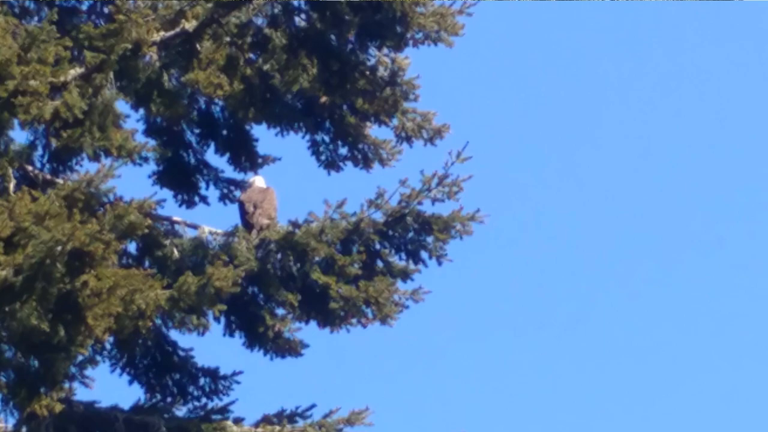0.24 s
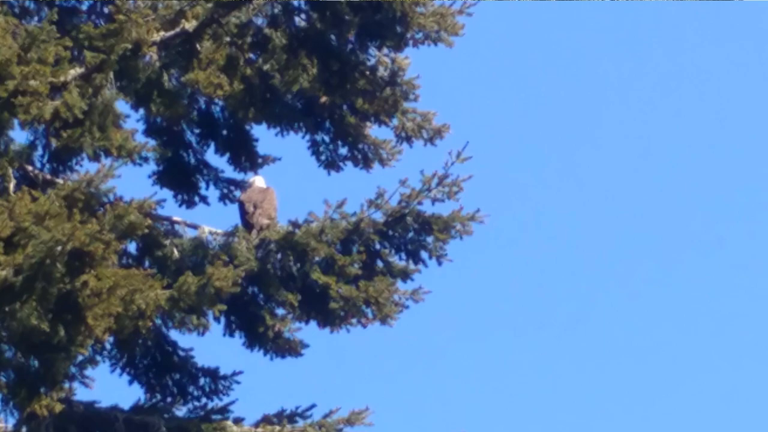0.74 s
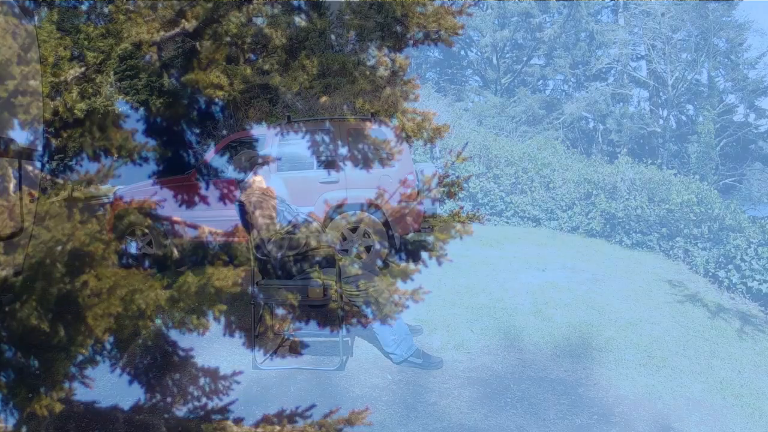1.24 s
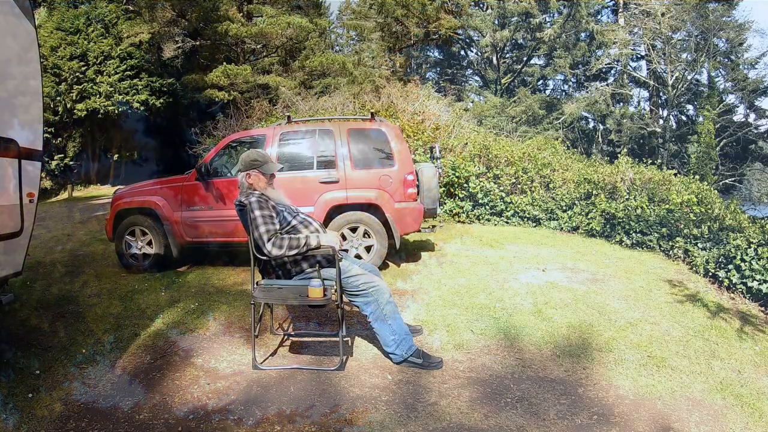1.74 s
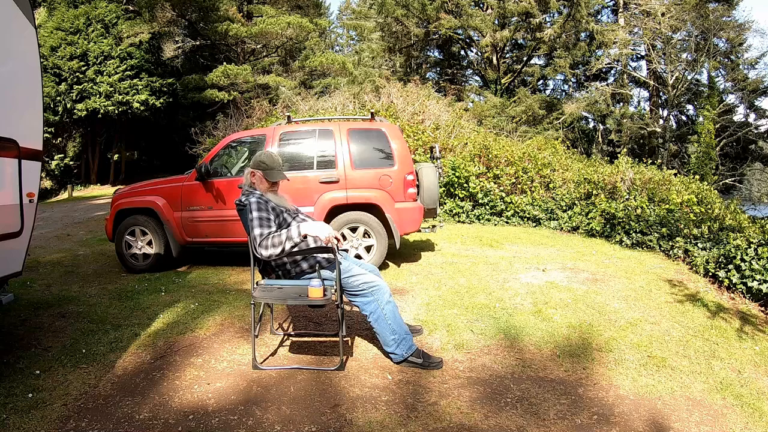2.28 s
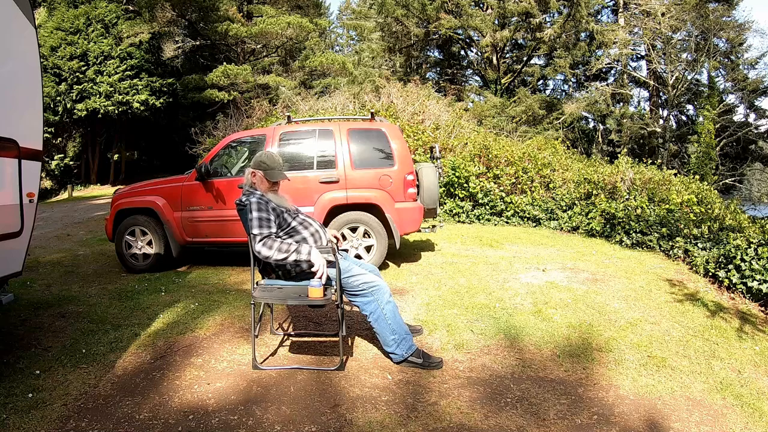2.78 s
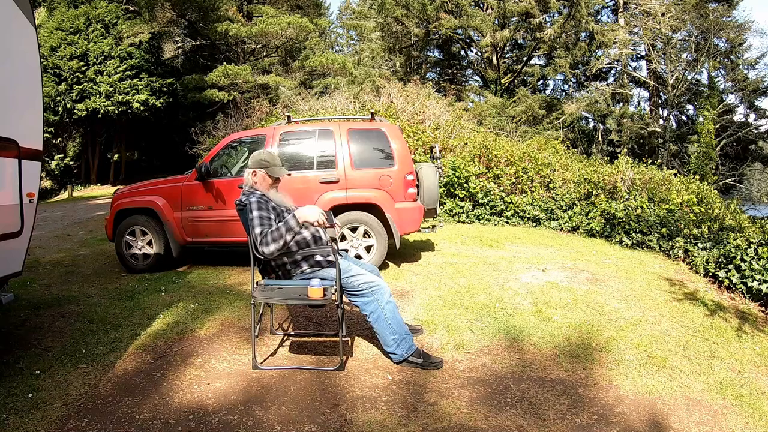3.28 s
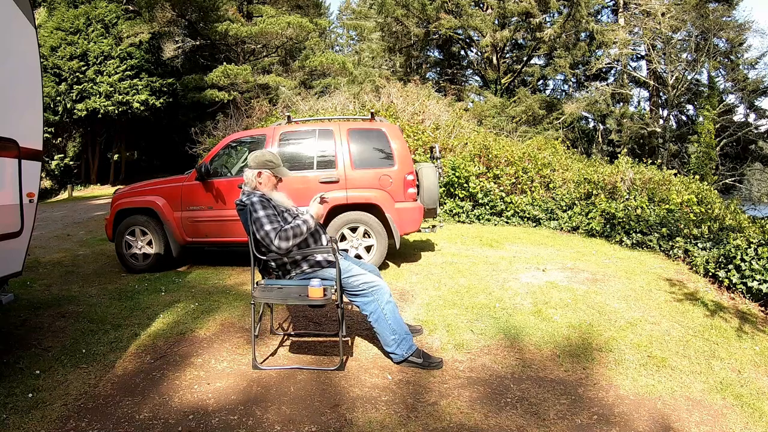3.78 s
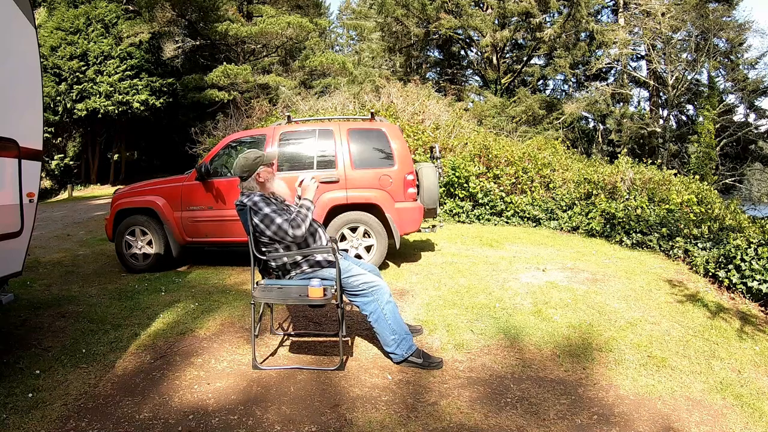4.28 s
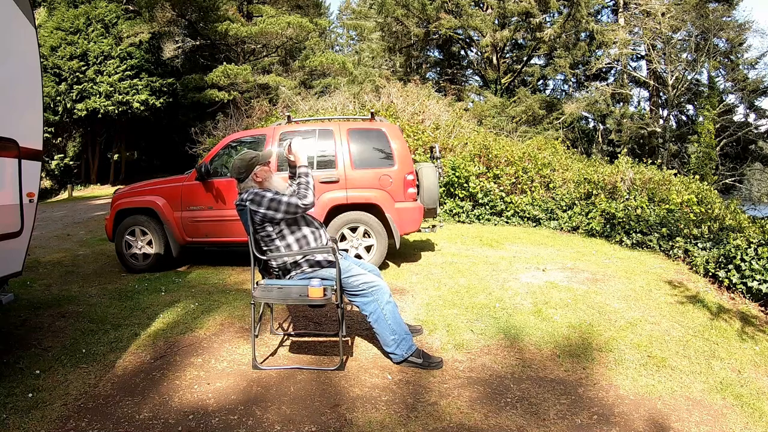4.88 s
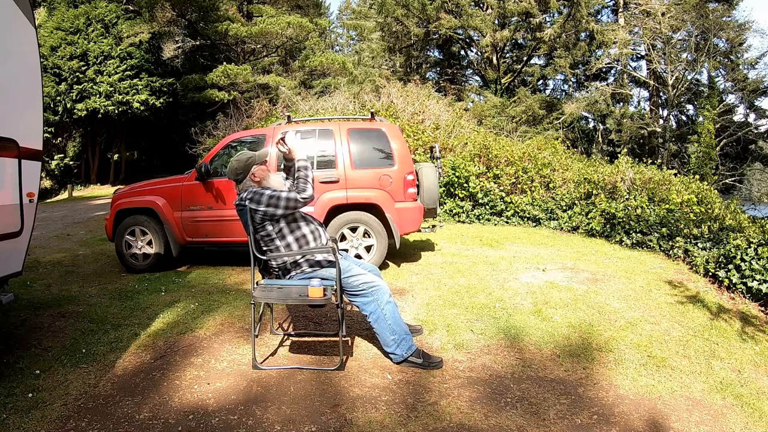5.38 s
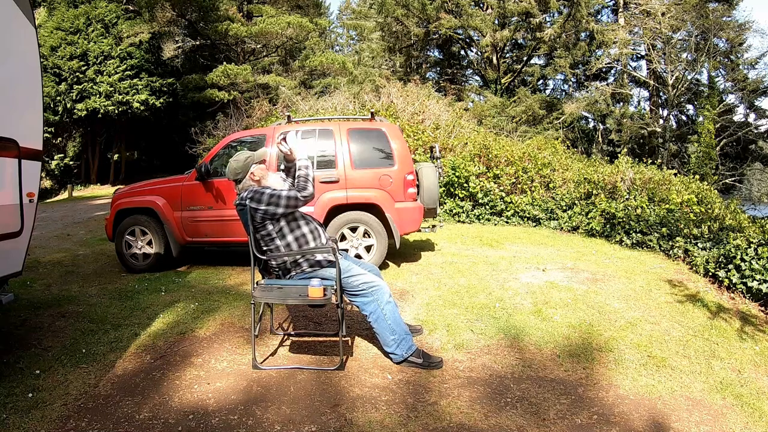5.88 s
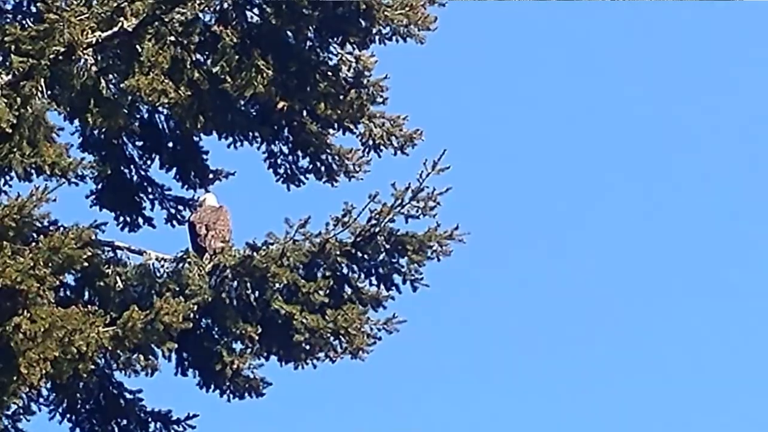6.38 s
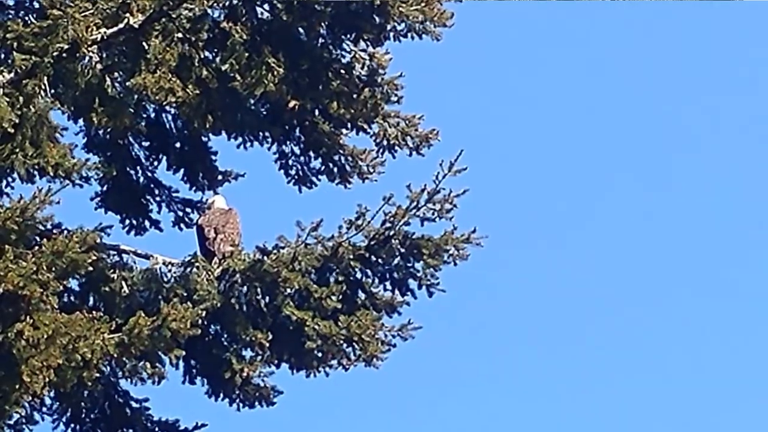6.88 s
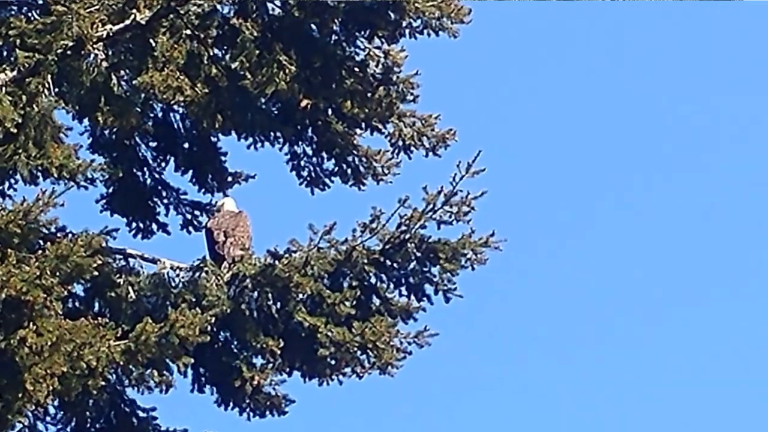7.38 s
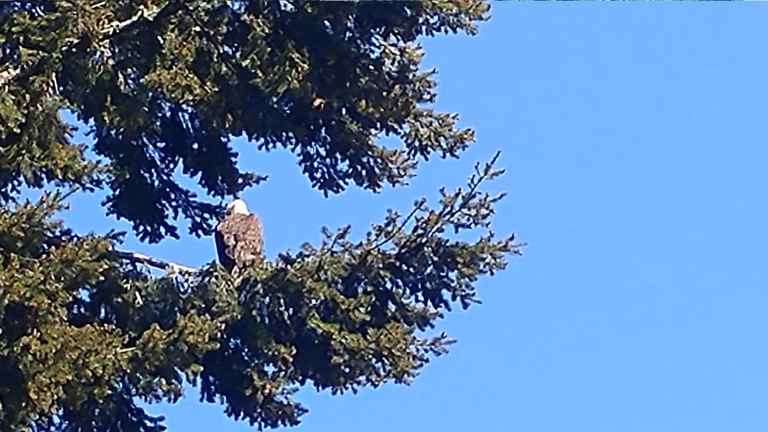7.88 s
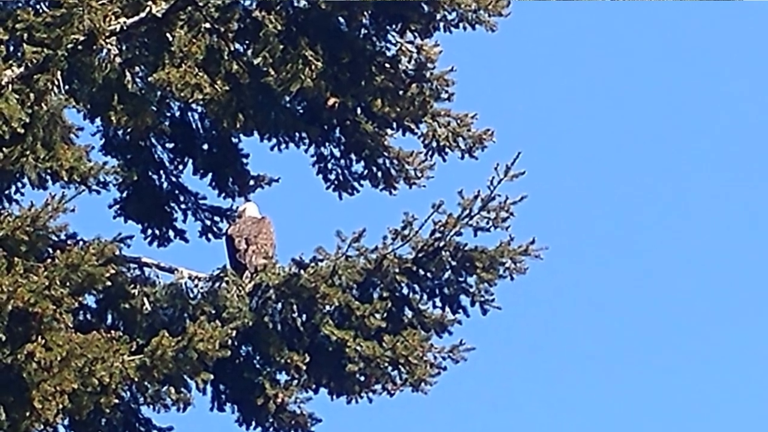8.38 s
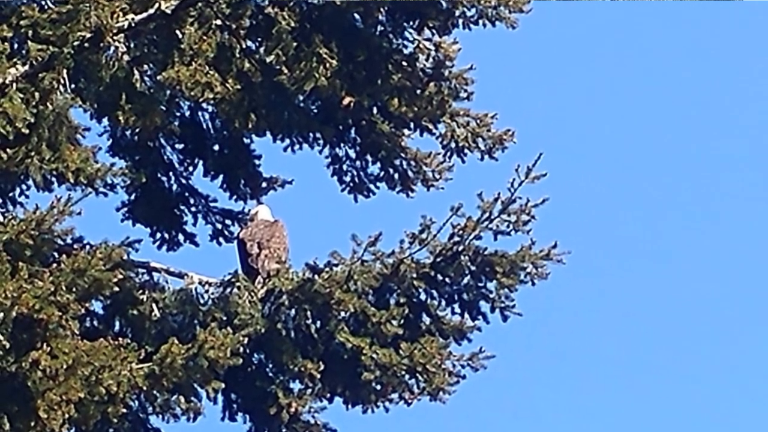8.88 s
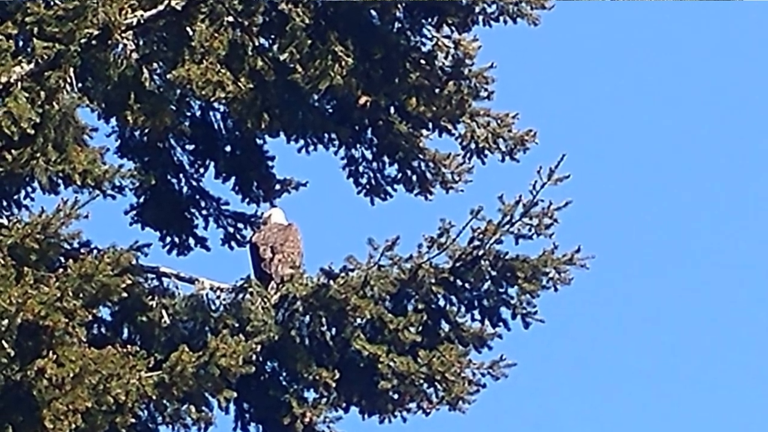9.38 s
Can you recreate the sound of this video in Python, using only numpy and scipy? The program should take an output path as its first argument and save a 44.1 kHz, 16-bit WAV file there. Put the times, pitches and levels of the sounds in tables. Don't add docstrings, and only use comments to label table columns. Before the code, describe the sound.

Thin, whistled eagle chatter comes early, slightly right of centre, its short notes dropping in pitch and fading into dense woodland echo. Then mostly low steady hiss and gentle wind rumble, with dry ticks to the right, a single woody knock and two breathy arched squeaks. Tiny birds peep faintly. Finally the eagle returns with brief yelping low-high pipes, cracking at their ends, while wind rumbles a little more.

```python
import sys
import numpy as np
from scipy import signal
from scipy.io import wavfile
from scipy.ndimage import uniform_filter1d

SR = 44100
rng = np.random.default_rng(int(sys.argv[2]) if len(sys.argv) > 2 else 0)


def elevation(decibels):
    levels = np.asarray(decibels, float)
    return 10 ** (levels / 20)


def store_wav(level_fs):
    pcm = np.round(np.clip(np.atleast_2d(level_fs), -1, 1) * 32767)
    wavfile.write(sys.argv[1], SR, pcm.T.astype(np.int16))


N = 425124
TOP_HZ = 10680


def evened(x):
    return x / np.sqrt(np.mean(x ** 2) + 1e-20)


def read(points, hz):
    f, value = np.transpose(points)
    return np.interp(np.log(hz + 1), np.log(f + 1), value)


def add(mix, s, sound):
    part = mix[..., round(s * SR):][..., :sound.shape[-1]]
    part += sound[..., :part.shape[-1]]


def resonate(x, hz, width):
    turn = np.exp(2j * np.pi * np.cumsum(hz * np.ones(len(x))) / SR)
    r = np.exp(-np.pi * width / SR)
    return 2 * (turn * signal.lfilter([1 - r], [1, -r], x / turn)).real


def band(x, lo_hz, hi_hz):
    corners = np.clip([lo_hz, hi_hz], 20, SR / 2.2)
    return signal.sosfilt(signal.butter(2, corners, "bandpass", fs=SR, output="sos"), x)


def ends(length, rise, fall):
    t = np.arange(0, max(length, .003), 1 / SR)
    nearest_end = np.minimum(t / rise, (t[-1] - t) / fall)
    return t, np.sin(np.pi / 2 * np.clip(nearest_end, 0, 1)) ** 2


def swell(rise_s, fade_s, top_db, ends_db):
    t = np.arange(0, rise_s + fade_s, 1 / SR)
    return top_db + np.interp(t, [0, rise_s, rise_s + fade_s], [ends_db, 0, ends_db])


def whistle(hz, shape, level_db, partials, waver, breath_db, fuzz, bloom_s=1e-4):
    air = rng.standard_normal((2, len(hz) + 200))
    slow = signal.sosfilt(signal.butter(4, 300, fs=SR, output="sos"), air)
    wobble, flutter = evened(slow)[:, 200:]
    turn = 2 * np.pi * np.cumsum(hz * (1 + waver * wobble)) / SR
    bloom = (1 - np.exp(-np.arange(len(hz)) / (bloom_s * SR))) ** 2
    upper = sum(elevation(db) * np.sin(k * turn) for k, db in partials)
    mean_hz = hz.mean()
    breath = band(band(air[0], .6 * mean_hz, 1.2 * mean_hz), .6 * mean_hz, 1.25 * mean_hz)
    voice = np.sin(turn) + (1 + fuzz * flutter) * bloom * upper
    voice += elevation(breath_db) * evened(breath)[200:]
    return np.sqrt(2) * elevation(level_db) * voice * shape


def pipe(length, start_hz, end_hz, level_db, dull_db=0, husk_db=0):
    # note f/Hz, level/dB
    second_partial = [(1520, -10), (1890, -19.5), (2500, -33), (3050, -28.5)]
    # multiple of f, level/dB
    higher_partials = [(2.3, -44), (3, -52.5), (4, -56)]
    t, shape = ends(length + .003, rise=.005, fall=.007)
    hz = start_hz + (end_hz - start_hz) * t / t[-1]
    partials = [(2, read(second_partial, hz.mean()) + dull_db), *higher_partials]
    return whistle(hz, shape, level_db, partials, waver=.003, breath_db=-28.5 + husk_db, fuzz=.2)


def chatter():
    # t/s, length/s, top f/Hz, sag f/Hz, level/dB
    chatter_notes = [
        (0.289, 0.067, 2749, 173, -17.5),
        (0.402, 0.06, 2842, 328, -17.5),
        (0.502, 0.044, 2804, 174, -17.5),
        (0.616, 0.04, 2740, 137, -16.5),
        (0.744, 0.039, 2720, 100, -16.5),
        (0.871, 0.029, 2683, 222, -19),
        (1.002, 0.017, 2632, 140, -22),
        (1.341, .025, 2435, 90.5, -33),
    ]
    # lead t/s, f/Hz, level/dB
    grace_notes = [
        (0.001976, 2250, -45),
        (0.0015, 3090, -24.5),
        (0.0028, 3100, -32.5),
        (0.0011, 2250, -36.5),
        (0.0028, 1920, -35.5),
        (.003, 1950, -30.5),
        (.004, 1940, -27),
        (0.0012, 1890, -30.5),
    ]
    # multiple of f, level/dB
    chatter_partials = [(1.5, -59.5), (2, -20), (2.5, -48.5), (3, -29.5), (3.5, -54.5), (4, -55.5),
                        (4.5, -53.5), (5, -50)]
    grace_pull = 0.37
    out = np.zeros((2, N))[0]
    for (s, length, top_hz, sag_hz, level_db), (early, grace_hz, grace_db) in zip(chatter_notes, grace_notes):
        t, shape = ends(length, rise=.0045, fall=6.5 * length ** 2)
        scoop_hz = 130 if grace_hz > top_hz else 285
        hz = top_hz - scoop_hz * np.exp(-t / (.15 * length)) - sag_hz * (t / length) ** 2
        add(out, s, whistle(hz, shape, level_db, chatter_partials, waver=.002, breath_db=-39, fuzz=.22,
                            bloom_s=0.0053))
        pull_hz = grace_pull * (top_hz - grace_hz) / 2
        grace = pipe(0.0076, grace_hz - pull_hz, grace_hz + pull_hz, grace_db, dull_db=-8.5)
        add(out, s - early - .001, grace)
    return out


def piping():
    # t/s, time between rungs/s, level/dB, top rung over that/dB
    ladders = [
        (8.570, .0068, -22, -6.5),
        (9.024, .0065, -22, 0.5),
        (9.446, 0.0076, -21.5, 0.5),
    ]
    # length/s, start f/Hz, end f/Hz, level/dB
    rungs = [
        (.0095, 1438, 1606, -1),
        (.0115, 1745, 2036, 1.6),
        (.013, 2420, 2600, 1.7),
    ]
    # times middle rung f, times top rung f, level under the note/dB
    mixed_tones = [
        (1, 1, -26),
        (2, 1, -41),
        (-1, 2, -12.5),
    ]
    # t/s, length/s, start f/Hz, end f/Hz, level/dB
    first_try = [
        (8.118, 0.0066, 1506, 1712, -29),
        (8.119, 0.018, 1787, 1955, -26),
    ]
    # t/s, length/s, start f/Hz, end f/Hz, level/dB
    high_notes = [
        (8.274, 0.014, 3046, 3097, -22),
        (8.712, 0.015, 3098, 3050, -19.5),
        (9.139, 0.014, 3155, 2988, -20.5),
    ]
    # t/s, length/s, start f/Hz, end f/Hz, level/dB
    cracks = [(1.343, 0.0097, 2920, 3050, -47), (.355, 0.011, 2300, 2160, -42.5),
              (0.54, 0.013, 2134, 2000, -41), (8.293, 0.0046, 2980, 3270, -18),
              (8.296, 0.012, 3377, 2780, -30), (8.729, .012, 2390, 2970, -27),
              (9.159, 0.0087, 2630, 2250, -29), (9.183, .008, 2100, 1390, -38),
              (9.502, 0.0049, 2700, 2300, -25), (9.528, 0.0082, 2433, 2580, -31.5),
              (9.548, 0.02, 2616, 2330, -40.5), (9.550, 0.012, 1857, 1890, -35),
              (9.566, 0.018, 2104, 1435, -35), (9.584, 0.0065, 2260, 1510, -36)]
    husk_db = 9
    out = np.zeros(N)
    for s, step, level_db, top_db in ladders:
        for k, (length, start_hz, end_hz, db) in enumerate(rungs):
            rung_s = length + step - rungs[0][0] * 0.73
            rung_db = level_db + db + top_db * (k == 2)
            add(out, s + k * step - .001, pipe(rung_s, start_hz, end_hz, rung_db, husk_db=husk_db))
        for middle, top, db in mixed_tones:
            hz = round(middle) * rungs[1][2] + round(top) * rungs[2][1]
            add(out, s + 2 * step, pipe(step, hz, 1.015 * hz, level_db + db, husk_db=husk_db))
    for s, *note in first_try:
        add(out, s - .001, pipe(*note, dull_db=-11))
    for s, *note in high_notes:
        add(out, s - .001, pipe(*note))
    for s, *note in cracks:
        add(out, s - .001, pipe(*note, dull_db=-7.5, husk_db=husk_db))
    return out


def glides(rows):
    out = np.zeros(N)
    for s, length, start_hz, end_hz, level_db in rows:
        t, shape = ends(length, rise=0.0031, fall=0.0046)
        hz = start_hz + (end_hz - start_hz) * t / t[-1]
        add(out, s, whistle(hz, shape, level_db, [], waver=0.014, breath_db=-15.5, fuzz=0))
    return out


def drawn_air():
    # t/s, start f/Hz, level/dB
    draws = [
        (0.285, 5910, -51.5),
        (0.379, 6445, -49),
        (0.496, 6680, -49.5),
        (0.607, 5300, -42),
        (0.74, 4930, -45.5),
        (0.869, 4245, -47.5),
        (8.262, 6400, -54.5),
        (8.663, 6350, -54),
        (8.701, 5800, -57.5),
        (9.124, 5730, -50.5),
    ]
    return glides([(s, .011, hz, .86 * hz, db) for s, hz, db in draws])


def small_birds():
    # t/s, number of notes, start f/Hz, level/dB
    trills = [
        (1.191, 3, 5120, -59),
        (8.204, 2, 3470, -49),
    ]
    # t/s, length/s, start f/Hz, end f/Hz, level/dB
    peeps = [
        (0.113, 0.034, 6000, 5400, -73.5),
        (1.57, 0.0102, 4440, 4300, -75),
        (2.056, 0.0284, 4370, 4250, -73),
        (6.68, 0.012, 6800, 6800, -78),
        (7.656, 0.013, 7250, 6300, -70.5),
        (7.702, 0.026, 8200, 6200, -68.5),
        (8.656, 0.0069, 4030, 6400, -56),
        (8.882, .006, 6970, 6700, -62),
        (9.119, 0.0049, 4610, 6060, -41.5),
    ]
    gap_s, note_s, fall = .012, .009, .68
    rows = list(peeps)
    for s, count, hz, db in trills:
        rows += [(s + k * gap_s, note_s, hz, fall * hz, db) for k in range(round(count))]
    return glides(rows)


def rasped(hz, level_db):
    hz = uniform_filter1d(hz, size=600, mode="nearest")
    rasp, hiss = rng.standard_normal((2, SR // 2))[:, :len(hz)]
    for _ in range(4):
        rasp = resonate(rasp, hz, .2 * hz.mean())
        hiss = resonate(hiss, 0.85 * hz, 0.48 * hz.mean())
    sound = evened(rasp) + elevation(-8.0) * evened(hiss)
    return elevation(level_db) * sound * signal.windows.tukey(len(hz), .2)


def squeaks():
    # t/s, rise/s, fall/s, crest f/Hz, level/dB
    arches = [
        (5.595, .15, 0.052, 6970, -55.5),
        (5.85, 0.0616, 0.05, 5980, -50.5),
    ]
    # t/s, length/s, start f/Hz, end f/Hz, level/dB
    rasps = [
        (5.72, .05, 4950, 4400, -50.5),
        (5.715, .055, 2300, 2650, -55),
        (5.895, .055, 2650, 2600, -51.5),
        (6.05, .02, 3400, 3000, -55),
        (6.066, .014, 2700, 2300, -53),
        (6.05, .04, 1790, 2050, -54),
        (5.715, .065, 9700, 8900, -71),
        (5.895, .045, 8500, 8500, -72),
    ]
    foot_hz, end_hz = 3700, 3180
    out = np.zeros(N)
    for s, rise, fall, crest_hz, level_db in arches:
        t = np.arange(0, rise + fall, 1 / SR)
        up = np.clip(1 - t / rise, 0, 1)
        down = np.clip((t - rise) / fall, 0, 1)
        hz = crest_hz - (crest_hz - foot_hz) * up ** 2.7 - (crest_hz - end_hz) * down ** 2.2
        opening_db = -7 * np.clip(1 - t / 0.032, 0, 1)
        add(out, s, rasped(hz, level_db + opening_db - 11 * down ** 4))
        fill = evened(band(rng.standard_normal(SR // 4)[:len(t)], 2300, 6300))
        add(out, s, elevation(level_db - 7) * fill * np.sin(np.pi * down))
    for s, length, start_hz, end_hz, level_db in rasps:
        shape_db = swell(length / 2, length / 2, level_db, ends_db=-6)
        add(out, s, rasped(np.linspace(start_hz, end_hz, len(shape_db)), shape_db))
    return out


def tap(db, t60, body, tail_db):
    t = np.arange(6000) / SR
    decay = elevation(-60 * t / t60) + elevation(tail_db - 60 * t / .16)
    burst = rng.standard_normal(len(t)) * decay
    rung = sum(elevation(g_db) * resonate(resonate(burst, hz, width), hz, width) for hz, width, g_db in body)
    return elevation(db) * rung / abs(rung).max()


def chair():
    # t/s, peak level/dB, T60/s, left over right/dB
    tick_events = [
        (1.9911, -41.5, 0.016, -11),
        (2.1047, -58, 0.03, -7.5),
        (2.8934, -59, 0.03, -6),
        (2.966, -61, 0.03, -9),
        (3.0394, -61.5, 0.029, -5),
        (3.463, -64, 0.026, -8),
        (5.424, -50, 0.03, -8.5),
        (6.2648, -50, 0.016, -9),
    ]
    # t/s, peak level/dB, T60/s
    knock = [
        (3.2073, -22.5, 0.045),
    ]
    # f/Hz, width/Hz, level/dB
    tick_body = [(4300, 1200, 0), (5800, 1400, 0), (9600, 1600, -9)]
    # f/Hz, width/Hz, level/dB
    knock_body = [(620, 760, 7), (1470, 320, 12), (2300, 450, 10), (3300, 970, 1), (4430, 2000, -4),
                  (5830, 1100, -24.5), (9200, 2000, -25)]
    # t/s, swell/s, fade/s, level/dB, ends/dB
    thud = [3.74, .035, .045, -45.5, -11.5]
    # t/s, swell/s, fade/s, level/dB, ends/dB
    rustle = [7.325, .012, .075, -63.5, -13]
    out = np.zeros((2, N))
    for s, db, t60, pan_db in tick_events:
        add(out, s, tap(db, t60, tick_body, tail_db=-14) * elevation([[pan_db / 2], [-pan_db / 2]]))
    add(out, knock[0][0], tap(*knock[0][1:], knock_body, tail_db=-11)[None])
    level_db = swell(*thud[1:])
    low_noise = band(rng.standard_normal((1, SR // 4))[:, :len(level_db)], 135, 283)
    add(out, thud[0], elevation(level_db) * evened(low_noise))
    level_db = swell(*rustle[1:])
    cloth = band(rng.standard_normal((2, SR // 4))[:, :len(level_db)], 3500, 12500)
    add(out, rustle[0], elevation(level_db) * evened(cloth))
    return out


def trees(x, near_s, far_drop_db):
    # t/s, level/dB
    boughs = [
        (.0095, -11.5),
        (0.0173, -12),
        (.041, -15.5),
        (.085, -32),
    ]
    # f/Hz, T60/s
    scatter_t60 = [(500, .8), (1900, 1.5), (2500, 1.1), (3100, 0.89), (5500, 1.2), (9000, 0.6)]
    # f/Hz, level/dB
    scatter_colour = [(1400, -2.5), (1900, -2.5), (2500, 1), (3100, 0), (5500, 7), (8000, 1), (12000, -8.5)]
    # f/Hz, level/dB
    scatter_width = [(1000, -20.5), (3000, -30.5), (5000, -16.5), (9000, -5.5)]
    scatter_db = -3
    taps = np.zeros((2, SR))
    at = np.arange(600, SR - 20, 20) + rng.integers(0, 20, (2, (SR - 601) // 20))
    np.put_along_axis(taps, at, rng.choice([-1., 1.], at.shape), 1)
    hz, t, z = signal.stft(taps, SR, nperseg=256)
    far = 1 / (1 + np.exp(-(t - near_s) / .006))
    clumps = uniform_filter1d(rng.standard_normal(z.shape[1:]), size=2, axis=1)
    clumps = evened(uniform_filter1d(clumps, size=4, axis=0))
    decay_db = -60 * t / read(scatter_t60, hz)[:, None]
    z = z * elevation(decay_db + far_drop_db * far + 2.2 * clumps + read(scatter_colour, hz)[:, None])
    z[1] *= elevation(read(scatter_width, hz) - scatter_db)[:, None]
    mid, side = elevation(scatter_db - 27.5) * signal.istft(z, SR, nperseg=256)[1]
    for s, db in boughs:
        mid[round(s * SR)] += elevation(db)
    return signal.fftconvolve(x[None], np.array([mid + side, mid - side]), axes=1)[:, :N]


def wash():
    # f/Hz, level per Hz/dB
    wash_low = [(12, -37.5), (20, -23.5), (65, -6), (113, -5.5), (141, -3.5), (169, -7), (198, 4.5),
                (221, -12), (295, -7.5), (416, -13), (812, 0.5), (1500, -7), (1950, -41), (3300, -120)]
    # f/Hz, level per Hz/dB
    wash_high = [(880, -30), (1500, -0.5), (2010, -6), (3340, -18.5), (3610, -23), (5820, -26), (7580, -37),
                 (9580, -33.5), (10600, -50.5), (12100, -60), (15400, -54)]
    # f/Hz, likeness
    likeness = [(30, 1), (100, 0.96), (290, 0.92), (640, 0.72), (1400, 0.37), (3000, 0.7), (6800, 0.076),
                (15000, 0.061)]
    # f/Hz, left over right/dB
    balance = [(60, -1), (150, 0.5), (380, 2.5), (950, -3), (2380, 0.5), (5980, -4.5), (15000, -7)]
    # t/s, level/dB
    wind = [(0, 8.5), (.7, 10), (1.4, 9), (2, 4), (3, -4.5), (3.8, 1.5), (5.1, -1.4), (6.1, 6.5), (6.6, -3),
            (7.6, 12.5), (8.1, 14), (8.7, 10), (9.64, 9.5)]
    # t/s, half length/s, level/dB
    hiss_swells = [
        (0.299, 1.3, 8),
        (3.793, .4, 2.2),
        (5.956, .4, 6),
        (7.605, .3, 3.5),
        (9.64, .4, 2),
    ]
    frames, hz = N // 256 + 5, np.fft.rfftfreq(1024, 1 / SR)
    t = np.arange(frames) * 256 / SR
    a, b, c, d, patches = rng.standard_normal((frames, 513, 5)).T
    lumps = evened(uniform_filter1d(patches[0], size=18))
    patches = evened(uniform_filter1d(uniform_filter1d(patches, size=10, axis=0), size=14, axis=1))
    rumble_db = np.interp(t, *np.transpose(wind)) + 3 * lumps
    wash_db = 0.16 + 0.2155 * t
    hiss_db = -1.54 + sum(db * np.exp(-((t - s) / half) ** 2) for s, half, db in hiss_swells)
    colour_db = np.where(hz < 1500, read(wash_low, hz), read(wash_high, hz) - 9)
    low = (1 / (1 + (hz / 130) ** 4))[:, None]
    high = (1 / (1 + (5000 / (hz + 1)) ** 3))[:, None]
    field_db = colour_db[:, None] + low * rumble_db + (1 - low) * wash_db + high * hiss_db
    field_db += 12 * (hz > TOP_HZ)[:, None] + 0.25 * patches
    same, left = np.clip(read(likeness, hz), -1, 1)[:, None], a + 1j * b
    z = np.array([left, same * left + np.sqrt(1 - same ** 2) * (c + 1j * d)])
    lean = read(balance, hz)[:, None] / 2
    z *= elevation(field_db) * elevation([lean, -lean])
    return elevation(-47) * evened(signal.istft(z, nperseg=1024, noverlap=768)[1][:, :N])


def hum():
    return elevation(-60) * evened(resonate(rng.standard_normal(N), hz=196.4, width=18))


def scene():
    run, piped, near = chatter(), piping(), squeaks()
    small = drawn_air() + small_birds()
    echoes = trees(run + small + 0.67 * near, near_s=0.14, far_drop_db=-8)
    echoes = echoes + trees(piped, near_s=.12, far_drop_db=-9.5)
    birds = (run + piped + small + echoes) * elevation([[-.75], [.75]])
    return birds + near * elevation([[-3], [3]]) + chair() + wash() + hum()


def band_limit(x):
    return signal.sosfilt(signal.butter(12, 15600, fs=SR, output="sos"), x)


def record(dry):
    # t/s, share
    top_kept = [(0, .5), (1.3, .4), (1.9, .02), (6.9, .02), (7.35, .65), (9.64, .55)]
    hz, t, z = signal.stft(dry, SR, nperseg=1024, noverlap=512)
    luck = rng.random((len(t) // 2 + 1, 65)).T
    luck = np.repeat(np.repeat(luck, 8, 0), 2, 1)[:len(hz), :len(t)]
    edge_hz = TOP_HZ + 350 * np.repeat(rng.standard_normal(len(t)), 2)[:len(t)]
    kept = (hz[:, None] < edge_hz) | (luck < np.interp(t, *np.transpose(top_kept)))
    kept = kept & (hz[:, None] < 15700)
    mix = signal.istft(z * kept, SR, nperseg=1024, noverlap=512)[1][:, :N]
    return band_limit(mix)


dry = scene()
out = record(dry)
store_wav(out)
```